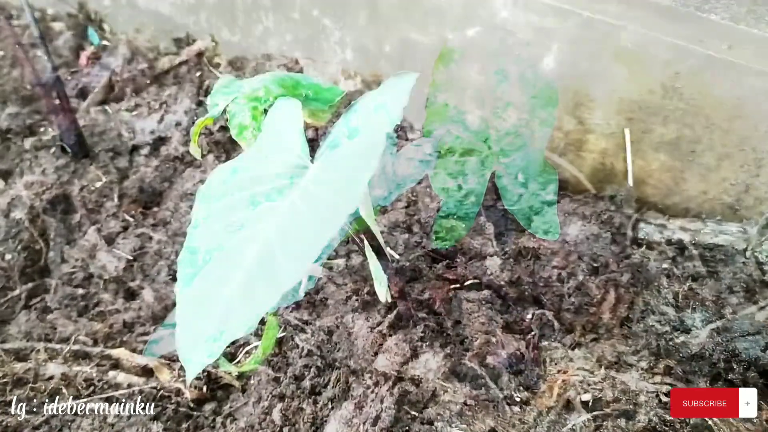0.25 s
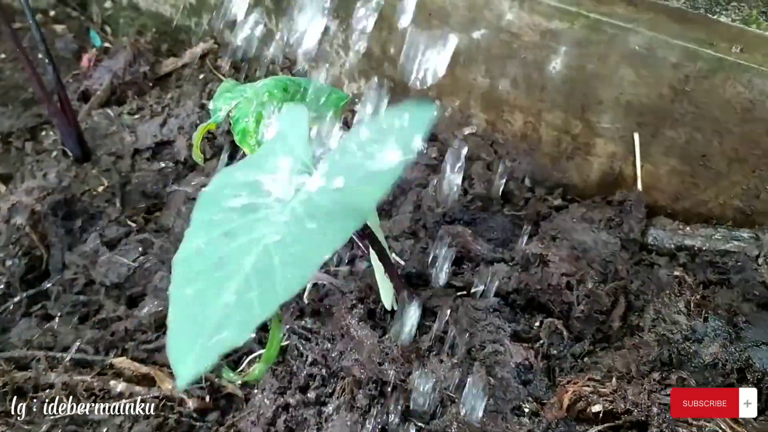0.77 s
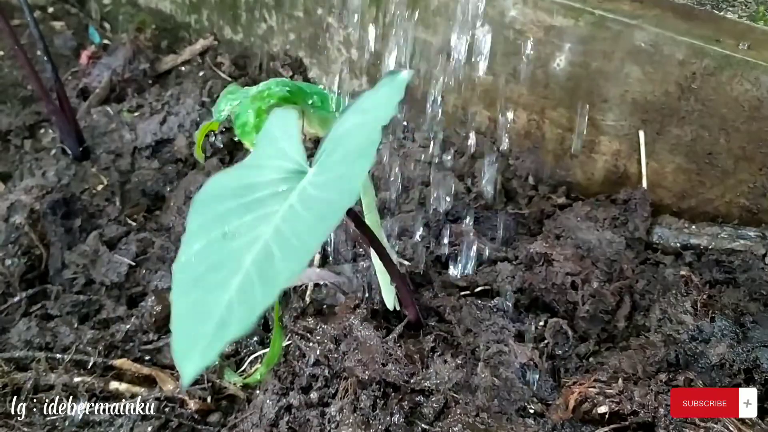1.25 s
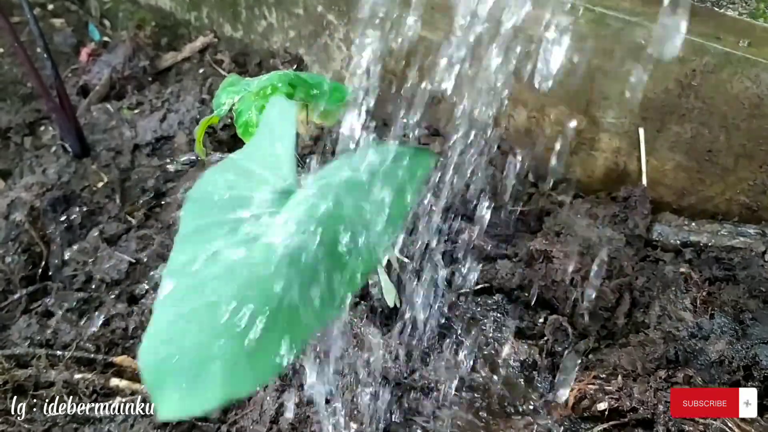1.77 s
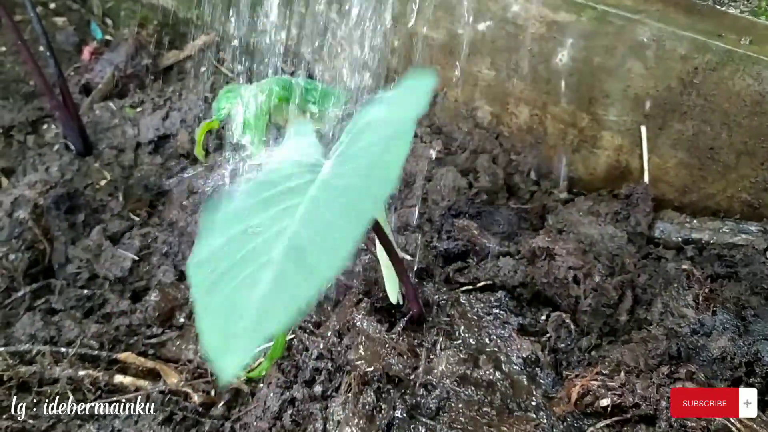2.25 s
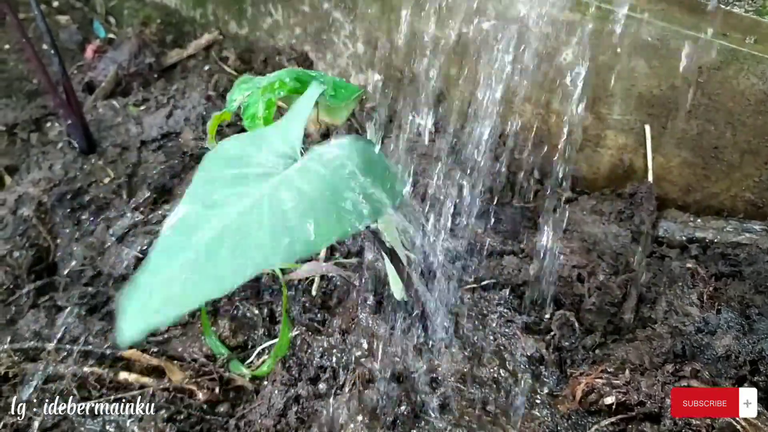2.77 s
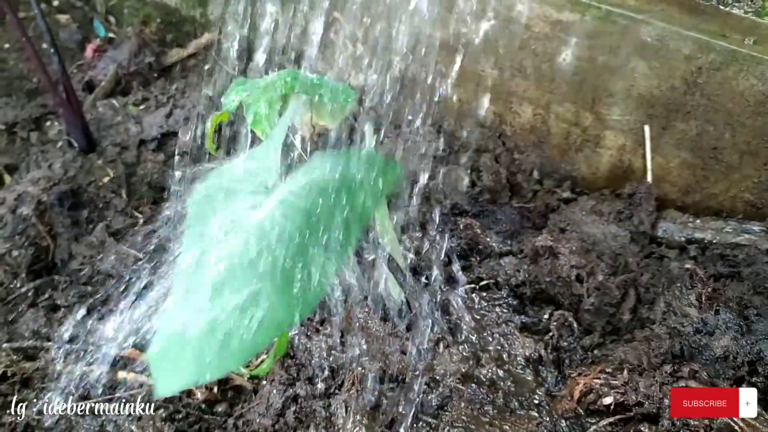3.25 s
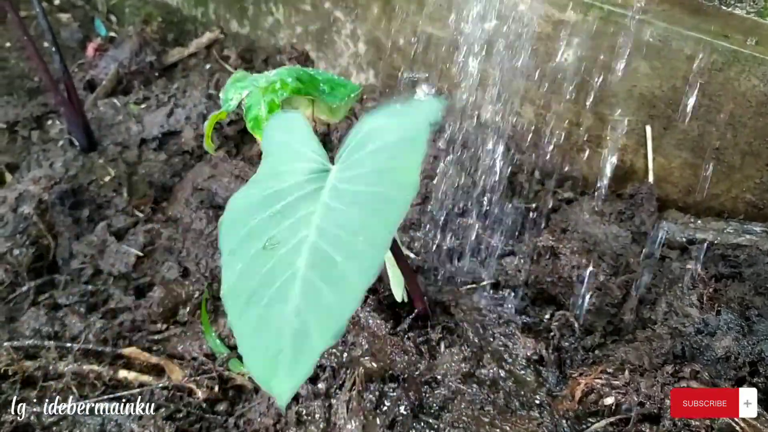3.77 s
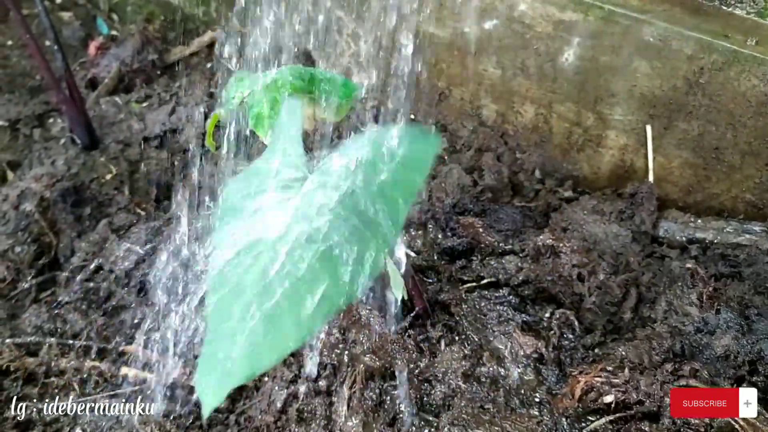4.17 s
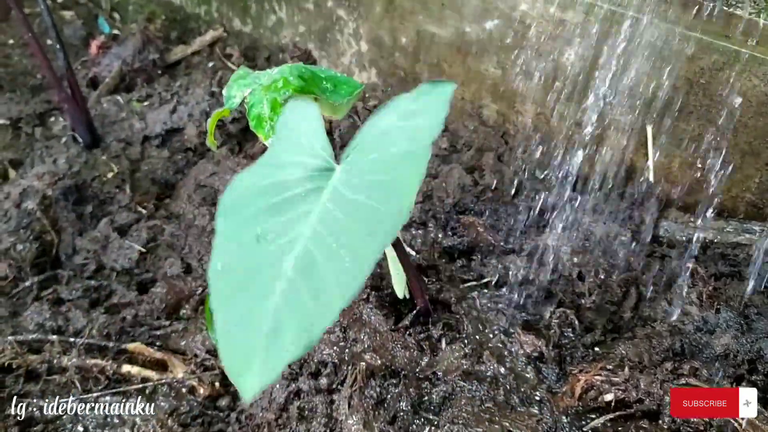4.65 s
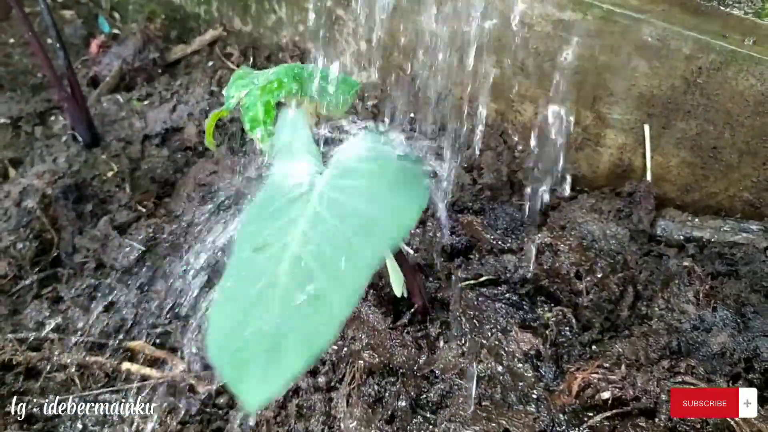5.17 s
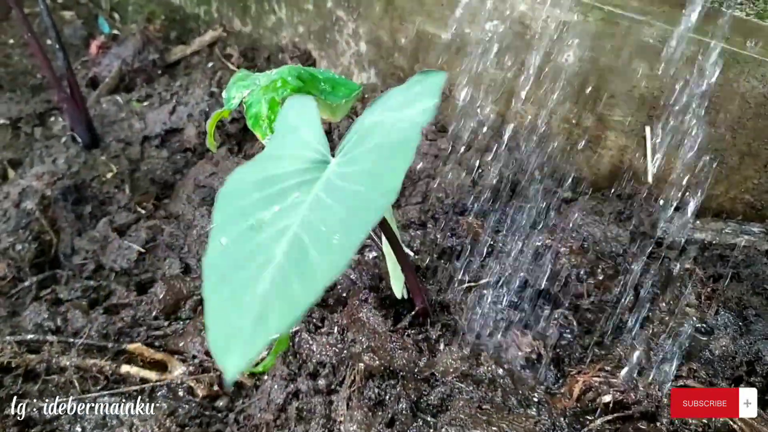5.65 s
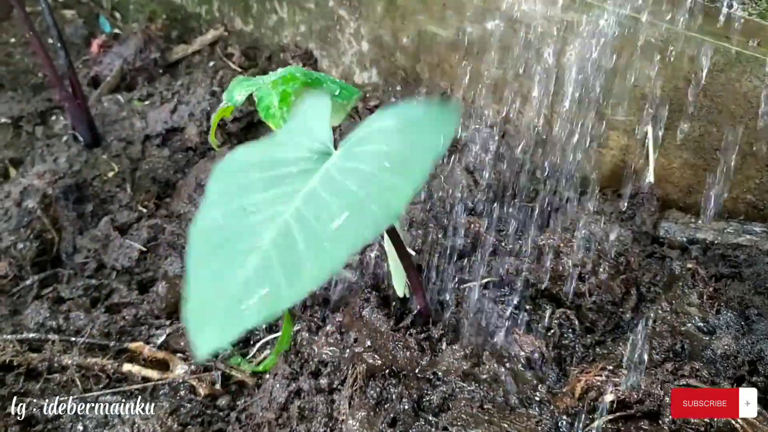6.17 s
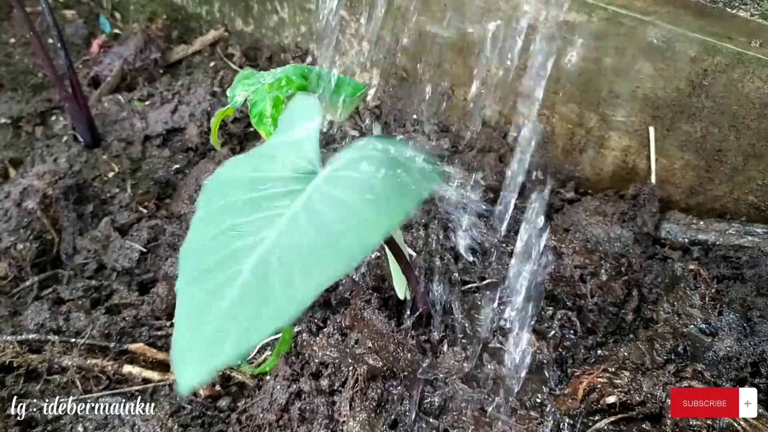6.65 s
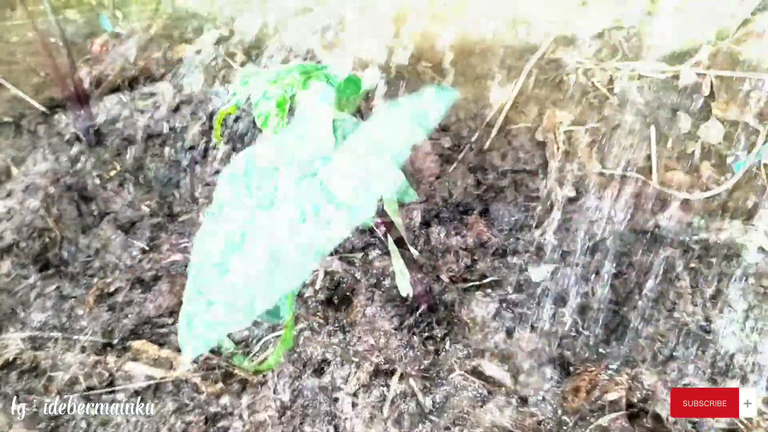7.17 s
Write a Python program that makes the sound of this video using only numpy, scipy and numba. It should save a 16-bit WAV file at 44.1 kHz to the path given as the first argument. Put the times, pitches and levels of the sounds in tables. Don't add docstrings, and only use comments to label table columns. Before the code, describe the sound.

Close, dry outdoor stereo with a bright small-microphone edge. From 0 to 1 s, quiet garden air and a low, faint traffic rumble lie under scattered sharp ticks, mostly left at first, with dull leaf taps and a few tiny rounded drips. Around 1 s the watering can's shower thickens into fizzing, irregular patter on wet soil, with bright splats and short bubble plops. Between 1.8 and 4.4 s it swings back and forth; longer soft, papery drumming comes as water crosses the broad leaf near 1.8, 2.4, 3.1 and 4 s, with a strong bubbly pop at 4.1 s. After 5 s the splats crowd closer and louder, with watery plops and another leaf crossing. A hard cluster of splats and leaf slaps hits near 6.8 s, then dense crisp showering and light drumming continue to a full, unfaded stop around 7.4 s.

```python
import sys
import numpy as np
from scipy import signal
from scipy.fft import rfft, irfft, next_fast_len
from scipy.io import wavfile
from scipy.ndimage import uniform_filter1d
from numba import njit

SR = 44100
rng = np.random.default_rng(int(sys.argv[2]) if len(sys.argv) > 2 else 0)


def generate_wav(signal):
    frames = np.transpose(np.atleast_2d(signal))
    scaled = np.clip(frames, -1, 1) * 32767
    pcm = np.round(scaled).astype(np.int16)
    wavfile.write(sys.argv[1], SR, pcm)


def invert_db(x):
    u = np.asarray(x, float) / 20
    return 10 ** u


N = 327222

# frequency in Hz, level in dB per Hz.
TRAFFIC_COLOUR = [(15, -50), (30, -29), (50, -1.5), (75, 4.5), (88, -1), (101, 5), (130, -9), (210, -20.5),
                  (350, -120)]
# frequency in Hz, level in dB per Hz.
AIR_COLOUR = [(76, -39), (130, 0.5), (263, -3.5), (1050, -12.5), (3500, -13), (6000, -14), (9000, -15),
              (15000, -24)]
# time in seconds, rumble in dB, shower left minus right in dB.
AROUND_CURVE = [(0.0, -55, 6), (0.2, -54, 16), (0.6, -50.5, 0), (0.72, -56.5, 0), (1.84, -56, 2),
                (4.36, -59.5, 1), (4.75, -57.5, 5), (5.0, -60, 0.5), (5.58, -57.5, 2.5), (5.99, -60, -0.5),
                (6.08, -52.5, 1.5), (6.38, -58, 4), (6.94, -48.5, 0.5), (7.21, -52.5, 2), (7.42, -49, 1.5)]
# time in seconds, flow in dB.
FLOW_CURVE = [(0.0, -65.5), (0.35, -61), (0.62, -60), (1.1, -49.5), (1.55, -47.5), (2.05, -50),
              (2.35, -46.5), (2.6, -52), (2.93, -48), (3.5, -50), (4.25, -47), (4.65, -49), (5.45, -47),
              (6.0, -50.5), (6.25, -45.5), (6.7, -50.5), (6.76, -42), (7.42, -41)]
# time in seconds, gain of fine spray in dB, gain of coarse patter in dB.
ROSE_GUSHES = [(0.39, -0.5, 13), (0.45, 6.5, -23), (0.57, 8, 1.5), (0.677, 11.5, 11.5), (0.85, 5, 1.5),
               (1.01, 6.5, 6), (1.2, 2, -3), (1.45, 4, -1.5), (1.682, 5, 13), (2.3, 0, 2), (2.71, 3.5, -5),
               (2.96, 4.5, 1.5), (3.201, 0.5, 3), (3.42, 4, 2.5), (4.1, -1, 6), (4.56, 1.5, -10),
               (4.99, -2, -4.5), (5.06, -2.5, 12), (5.27, -1.5, 5.5), (5.37, -4.5, -12), (5.44, 5.5, 9),
               (5.6, -0.5, 0), (5.67, 0.5, 0), (5.93, 3.5, 6), (6.57, 2, 2.5), (6.78, 0, 8), (7.03, 0.5, 5),
               (7.4, -4, 3.5)]
# start in seconds, length in seconds, drumming in dB,
# change during the crossing in dB.
LEAF_CROSSINGS = [(0.286, 0.13, -62, -3), (0.458, 0.15, -55, 2.5), (0.66, 0.052, -66, 11),
                  (0.838, 0.045, -54, 0), (1.002, 0.22, -59.5, -7.5), (1.396, 0.021, -56, 2.5),
                  (1.57, 0.1, -63, -7), (1.762, 0.29, -54, -4.5), (2.412, 0.39, -51.5, -0.5),
                  (3.096, 0.5, -52, 1), (3.99, 0.34, -52.5, 4.5), (4.877, 0.4, -56.5, -5),
                  (5.811, 0.059, -54, -1), (5.923, 0.092, -58, 5.5), (6.732, 0.11, -54.5, 0),
                  (6.89, 0.8, -56.5, 0)]
# start in seconds, peak in dB,
# droplet pitch in Hz, left minus right in dB.
TIPPING_SPLATS = [(0.1493, -64, 11600, 58), (0.166, -37.5, 7800, 16), (0.228, -54, 9900, 17),
                  (0.2446, -32.5, 9300, 15), (0.2525, -46, 9400, 8), (0.318, -34.5, 6060, 10),
                  (0.323, -37, 11100, 10), (0.3736, -33, 7600, 10), (0.377, -25, 8700, 18),
                  (0.3834, -25, 9400, 4), (0.443, -29, 9000, 7), (0.4554, -35, 10300, 7),
                  (0.471, -28.5, 10900, 5), (0.536, -33, 9500, 13), (0.5508, -34, 10700, 6),
                  (0.5952, -31, 12300, -3), (0.617, -29, 11100, 0), (0.677, -38, 10400, 2),
                  (0.7007, -32, 11400, 0), (0.73, -26, 10400, 2), (0.734, -35, 9600, 10),
                  (0.7676, -34, 10200, 7), (0.7945, -38.5, 11800, 2), (0.8253, -34.5, 9700, 2),
                  (0.8362, -35, 8600, -6), (0.8457, -25, 8400, -3), (0.8942, -34, 10000, -2),
                  (0.911, -32, 11600, 2), (0.9389, -41, 11500, -3), (0.9678, -29, 11000, 1),
                  (0.9901, -25, 7060, 4), (1.0156, -19, 11700, -4), (1.1137, -27, 10200, 1),
                  (1.179, -29, 11100, 6), (1.1951, -19.5, 9600, 4.5), (1.2097, -28, 12200, 4),
                  (1.2847, -32, 8300, 6), (1.3633, -27, 9700, -4), (1.4357, -22.5, 7100, 3),
                  (1.469, -27.5, 9100, 15), (1.5072, -28, 10800, 4), (1.5137, -23.5, 10700, 6),
                  (1.6068, -29, 8700, 11), (1.6161, -31, 12200, -5), (1.654, -25, 10000, 1),
                  (1.666, -29, 10100, 1), (1.681, -22.5, 9150, 9), (1.6966, -21, 8800, 8),
                  (1.7272, -24.5, 9500, 1), (1.8017, -33.0, 9300, 5)]
# start in seconds, peak in dB,
# droplet pitch in Hz, left minus right in dB.
SHOWER_SPLATS = [(1.8224, -21.5, 8600, 2), (1.8655, -31, 10500, 6), (2.097, -39, 8900, 5),
                 (2.1171, -40, 11000, 2), (2.1383, -40, 10500, 2), (2.2319, -31, 6300, 0),
                 (2.288, -34, 7700, -4), (2.3927, -31.0, 7300, 0), (2.6696, -28, 9400, 0),
                 (2.6775, -31, 9200, 5), (2.717, -25, 10300, 0), (2.781, -29, 9700, 0),
                 (2.8353, -35, 8200, -1), (2.8414, -37, 11500, 2), (2.8697, -29, 11100, -4),
                 (2.946, -27, 8960, 11), (3.0206, -30, 10900, 5), (3.0763, -39, 9500, 9),
                 (3.146, -28, 10000, 2), (3.2217, -29, 9900, 2), (3.2411, -44, 9900, 0),
                 (3.2999, -30, 9700, 0), (3.3085, -40, 9800, 0), (3.3611, -41, 8400, 1),
                 (3.519, -31, 12300, 5), (3.5334, -37, 9600, -5), (3.5469, -27, 9300, 11),
                 (3.7337, -21.5, 9200, 4), (3.782, -28, 8000, 6), (3.8464, -31, 7000, 4),
                 (3.8557, -37, 10300, 8), (3.869, -28.5, 8250, 4), (3.9473, -25.5, 9400, 4),
                 (3.9708, -30, 8800, 5), (3.989, -31, 8200, 10), (4.0756, -22.5, 8950, 7),
                 (4.1814, -39, 11000, -2), (4.2232, -24, 11700, -5), (4.2304, -26, 10300, 0),
                 (4.2702, -29, 9500, -4), (4.3061, -42, 10500, -5), (4.438, -22.5, 9200, 3),
                 (4.5627, -23, 7300, 6), (4.6632, -29.5, 7200, 8), (4.715, -33, 8300, 6),
                 (4.7294, -31, 11900, 5), (4.75, -33, 9500, 10), (4.8019, -31, 9000, 6),
                 (4.8278, -25, 10500, 3), (4.9077, -33, 10000, 9)]
# start in seconds, peak in dB,
# droplet pitch in Hz, left minus right in dB.
NEAR_SPLATS = [(4.9656, -22.5, 11700, -1), (4.9907, -30.5, 10100, -9), (5.0238, -43, 9400, 1),
               (5.0853, -29, 11400, -2), (5.1857, -27, 12800, -4), (5.2316, -27.5, 7700, -6),
               (5.2578, -30, 9800, -6), (5.267, -25.5, 10600, 0), (5.3102, -29.5, 9100, 9),
               (5.355, -31, 11600, 1), (5.382, -22, 10100, 7), (5.4077, -21.5, 9750, 2),
               (5.4295, -20, 10300, 4), (5.466, -22, 9900, 7), (5.4908, -20.5, 8000, 1),
               (5.5433, -26.5, 9800, 7), (5.6476, -27, 8500, 7), (5.6813, -24.5, 9200, 7),
               (5.762, -28.5, 8950, 6), (5.785, -28, 10200, 2), (5.815, -27, 8750, 4),
               (5.8203, -33, 9500, 5), (5.8697, -26, 11800, 0), (5.9359, -28, 10400, 8),
               (6.015, -30.5, 10000, -3), (6.044, -30, 9600, 3), (6.199, -23, 8650, 3),
               (6.2056, -21, 7150, 0), (6.307, -18, 8400, 1), (6.4101, -25, 9200, 6),
               (6.432, -19.5, 9700, 6), (6.477, -29, 9050, 6), (6.542, -24.5, 9400, 0),
               (6.5547, -27, 11000, -2), (6.627, -28, 6850, 6), (6.6307, -28, 9300, 4),
               (6.64, -33, 10100, 5), (6.7109, -39, 10700, 6), (6.7447, -18.5, 7900, 6),
               (6.762, -15, 9700, 2), (6.779, -22, 8160, 4), (6.8013, -24.5, 8800, 11),
               (7.0267, -21.5, 9450, 5), (7.1339, -36, 10700, 1), (7.256, -25.0, 10400, -4),
               (7.27, -18, 11000, 3), (7.2885, -34, 8100, 5), (7.346, -21, 9500, 1),
               (7.354, -19.5, 9200, 3), (7.397, -30, 11300, 10)]
# start in seconds, peak in dB, droplet pitch in
# Hz, left minus right in dB.
FURTHER_SPLATS = [(0.9884, -32, 6140, -1.5), (1.3269, -34, 11700, 1.0), (1.5863, -43, 9240, 2.5),
                  (1.906, -26.5, 6600, 1), (2.176, -27, 7000, 3), (2.3136, -42, 9290, 0.5),
                  (2.333, -28, 7550, 1), (2.6478, -41, 9150, 0.5), (2.6924, -30, 9620, -1),
                  (3.0051, -29, 10600, 9), (3.055, -33, 9700, 5), (3.179, -29, 9740, 5),
                  (3.571, -31, 9800, 2), (4.4176, -26, 11100, 2.5), (4.938, -32, 8760, -0.5),
                  (5.2116, -43, 11200, -1.5), (5.7064, -36, 11000, 1.5), (6.083, -30, 9990, -4),
                  (6.1744, -29, 8860, 2.5), (6.2465, -23, 9200, 2.0), (6.2547, -25, 7500, 2.0),
                  (6.2903, -30, 9600, 2.5), (6.2987, -26, 12000, 3.0), (6.3234, -31, 12200, 5),
                  (6.465, -30, 10300, 2.5), (6.493, -30, 10500, 2.5), (6.7295, -28, 9100, 1),
                  (6.7902, -21, 9800, 2.5), (6.8563, -34, 9600, -1), (6.9467, -21.5, 9800, 1.0),
                  (7.007, -28, 9310, 1), (7.152, -22.5, 9900, 3.0)]
# start in seconds, peak in dB, pitch in Hz, cycles of ringing.
POOL_DRIPS = [
    (0.165, -48, 1760, 7),
    (0.237, -48, 2100, 13),
    (0.371, -44, 2420, 13),
    (0.575, -46, 760, 13),
    (1.42, -41, 1520, 6.3),
    (1.655, -45, 1130, 7.3),
    (1.667, -50, 1000, 11),
    (7.023, -42, 1330, 14),
]
# start in seconds, peak in dB, pitch in Hz.
LEAF_SLAPS = [(0.276, -39.5, 1530), (0.292, -40.5, 830), (0.35, -46, 675), (0.545, -42, 690),
              (0.588, -42, 780), (0.729, -44, 805), (1.066, -39, 1360), (1.423, -39, 720),
              (1.653, -41, 1130), (1.907, -41, 770), (2.034, -51, 910), (2.667, -40, 880),
              (3.587, -40, 910), (4.154, -43, 904), (5.263, -38, 1370), (6.777, -35.5, 1740),
              (6.799, -35, 1820)]
# frequency in Hz, width in Hz, level in dB.
LEAF_MODES = [(420, 280, -4), (640, 200, -7), (870, 240, 0), (1400, 500, -9), (1960, 340, -3),
              (2500, 700, -8)]
# start in seconds, peak in dB, pitch in Hz, left minus right in dB.
BUBBLES = [(0.3186, -41, 5260, 12), (0.3726, -32, 4560, -8), (0.6316, -35, 3320, -4),
           (0.728, -41, 4470, -3), (0.8504, -19.5, 5000, 13), (1.0169, -38, 4530, 1),
           (1.408, -30.5, 4770, 15), (1.506, -30, 4960, 5), (1.657, -22.5, 4770, 3),
           (2.2337, -25, 5140, -4), (2.287, -30, 5250, -4), (2.5874, -26.5, 4740, 4),
           (2.6684, -33, 4600, -2), (2.8375, -33, 4500, 7), (2.944, -34, 5200, 3), (2.9774, -34, 3200, 2),
           (3.1354, -29, 4040, 14), (3.44, -36, 3800, -6), (3.5883, -47, 3820, 0), (3.7356, -47, 4300, 0),
           (3.7811, -30.5, 4200, -2), (3.793, -27.5, 3690, -3), (4.0762, -11.5, 4560, -1),
           (4.112, -28, 4500, -9), (4.2317, -41, 3600, 0), (4.4587, -31, 3680, 0), (4.533, -32, 5300, -7),
           (4.5757, -52, 4600, 7), (4.716, -33.5, 2800, 3), (4.751, -35.5, 2790, 8),
           (5.0277, -20, 4740, -15), (5.2666, -21, 2840, -1), (5.3817, -39, 4000, 0),
           (5.428, -24, 3700, -2), (5.465, -23.5, 3320, 2), (5.491, -25.5, 4400, 6),
           (5.5782, -30.5, 3780, 0), (5.617, -32, 2380, 11), (5.6832, -31, 5030, 5), (5.8153, -27, 4500, 1),
           (5.935, -29, 4550, 9), (6.0449, -45, 3800, 2), (6.3065, -45, 4800, 4), (6.4315, -29, 4260, 8),
           (6.496, -33, 4770, 8), (6.6275, -33, 4970, 2), (6.7774, -32, 4640, -9),
           (6.8753, -24.5, 2360, -3), (6.99, -36, 4000, -1), (7.0672, -26, 3600, 9), (7.346, -20, 5450, -2)]
# start in seconds, peak in dB, first pitch in Hz,
# last pitch in Hz, length in seconds.
CLOSING_CAVITIES = [
    (0.8483, -25, 3700, 6440, 0.0018),
    (2.2301, -23, 3880, 6800, 0.0023),
    (5.0236, -21.5, 2290, 6300, 0.0025),
]
# frequency in Hz, gain in dB.
MIC_TONE = [(20, 4.5), (3000, -3), (4000, -3), (7000, -1), (10000, 4.5), (13000, 3.5), (15500, 1.5),
            (15900, -16), (17000, -35)]

PORT_LAG = 14
FADE_DB = 18


def level(x, db):
    return x * invert_db(db) / np.sqrt(np.mean(x ** 2))


def colour(x, points):
    hz, db = np.transpose(points)
    size = next_fast_len(N)
    log_hz = np.log(np.arange(size // 2 + 1) * SR / size + 1)
    gain = invert_db(np.interp(log_hz, np.log(hz), db))
    return irfft(rfft(x, size) * gain, size)[..., :N]


def walk(rate):
    hold = int(SR / rate)
    steps = np.repeat(rng.standard_normal(N // hold + 1), hold)
    smooth = uniform_filter1d(uniform_filter1d(steps, hold), hold)
    return 2.42 * smooth[:N]


def stereo_noise(alike):
    mid, side = rng.standard_normal((2, N))
    alike = np.clip(alike, 0, 1)
    return np.sqrt(1 + alike) * mid + np.sqrt(1 - alike) * side * np.array([[1], [-1]])


def played(table):
    s, *columns = np.transpose(table)
    return (np.interp(np.arange(N) / SR, s, c) for c in columns)


@njit
def ring(start, hz, cycles, rise, size, out):
    for k in range(len(start)):
        i, f, phase, turns = int(start[k]), hz[k], 0., 0.
        while turns < 4 * cycles[k] and i < len(out) and f < .45 * SR:
            if i >= 0:
                out[i] += size[k] * min(turns, 1.) * np.exp(-turns / cycles[k]) * np.sin(phase)
            phase += 2 * np.pi * f / SR
            turns += f / SR
            f *= 1 + rise[k] * f / SR
            i += 1
    return out


def grains(s, hz, cycles, rise, db, pan_db, side):
    one = np.ones(len(s))
    ports = []
    for ear in (1, -1):
        start = s * SR + ear * side * PORT_LAG / 2
        size = invert_db(db + ear * pan_db / 2) * one
        ports.append(ring(start, hz * one, cycles * one, rise * one, size, np.zeros(N)))
    return np.array(ports)


def spatter(s, hz, db, count, lead_s, last_s, octaves, cycles, fall_db, width, pan_db=0.):
    when, tone, weak, place = rng.random((len(s), count, 4)).reshape(-1, 4).T
    s, hz, db, pan_db = (np.repeat(c, count) for c in (s, hz, db, pan_db + 0 * s))
    late = (lead_s + last_s) * when ** 2.5
    build_db = -9 * (1 - late / lead_s)
    fade_db = -fall_db * np.sqrt(late / last_s)
    shape_db = np.where(late < lead_s, build_db, fade_db)
    droplet_hz = np.minimum(hz * 2 ** (octaves * (tone - .5)), .4 * SR)
    return grains(s + late, droplet_hz, cycles, 0.016, db + shape_db - 9 * weak, pan_db,
                  width * (2 * place - 1))


def garden(rumble_db):
    rumble = level(colour(stereo_noise(.86), TRAFFIC_COLOUR), 0)
    rumble = rumble * invert_db(rumble_db - 1.0 + np.array([[.9], [-.9]]))
    air = level(colour(stereo_noise(0.71), AIR_COLOUR), -60) * invert_db(0.6 * walk(6.5))
    return rumble + air


def swing():
    gush_s, enter_s, leave_s = 0.038, 0.11, 0.14
    stray_db, coarse_db, coarse_on_leaf_db = -17.5, -10, -3.5
    t = np.arange(N) / SR
    flow_db, = played(FLOW_CURVE)

    s, fine_gain_db, coarse_gain_db = np.transpose(ROSE_GUSHES)[..., None]
    slow_t = t[::64]
    gush = np.exp(-.5 * ((slow_t - s) / gush_s) ** 2)
    fine_gain_db = np.interp(t, slow_t, np.sum(fine_gain_db * gush, axis=0))
    coarse_gain_db = np.interp(t, slow_t, np.sum(coarse_gain_db * gush, axis=0))

    drum = invert_db(flow_db + stray_db)
    for start, length, db, change_db in LEAF_CROSSINGS:
        corners = start + np.array([-enter_s, 0, length, length + leave_s])
        covered = np.interp(t, corners, [0, 1, 1, 0])
        drift_db = change_db * ((t - start) / length - .5).clip(-1, 1)
        drum = np.maximum(drum, covered * invert_db(db + drift_db))

    coarse = np.hypot(invert_db(flow_db + coarse_db), drum * invert_db(coarse_on_leaf_db)) * invert_db(coarse_gain_db)
    return invert_db(flow_db + fine_gain_db), coarse, drum


def patter(rate, hz, octaves, cycles, scatter_db, bunch_db, bunch_rate):
    when, u, v, size, place = rng.random((int(rate * N / SR), 5)).T
    spread = np.sqrt(-2 * np.log(1 - u)) * np.cos(2 * np.pi * v)
    size_db = scatter_db * np.minimum(-np.log(1 - size), 5)
    drop_hz = np.minimum(hz * 2 ** (octaves * spread), .4 * SR)
    drops = grains(when * N / SR, drop_hz, cycles, 0.026, size_db, 0., 2 * place - 1)
    return level(drops * invert_db(bunch_db * walk(bunch_rate)), 0)


def spray(rate=750):
    when, tone, size = rng.random((int(rate * N / SR), 3)).T
    bunch_db = 0.76 * walk(40)[(when * N).astype(int)]
    db = 3.4 * np.minimum(-np.log(1 - size), 3) + bunch_db
    hz = 9800 * 2 ** (1.54 * (tone - .5))
    bursts = spatter(when * N / SR, hz, db, count=15, lead_s=.002, last_s=0.013,
                     octaves=.6, cycles=3.2, fall_db=0.0, width=0.94)
    return level(bursts, 0)


def splats():
    drops = TIPPING_SPLATS + SHOWER_SPLATS + NEAR_SPLATS + FURTHER_SPLATS
    s, db, hz, pan_db = np.transpose(drops)
    side = (rng.random(len(s)) - .5) / 5
    tick = grains(s, hz, 1.67, 0., db + 2.5, pan_db, side)
    thud = grains(s, 0.57 * hz, 2.2, 0., db - 11, pan_db, side)
    burst = spatter(s + 0.00034, hz, db + 3.0, count=18, lead_s=0.000078, last_s=.008,
                    octaves=0.93, cycles=2.54, fall_db=FADE_DB, width=.7, pan_db=pan_db)
    return tick + thud + burst


def drips():
    s, db, hz, cycles = np.transpose(POOL_DRIPS)
    return grains(s, hz, cycles, 0.0034, db, 0., 0.14)


def slaps():
    s, db, hz = np.transpose(LEAF_SLAPS)
    return spatter(s, hz, db - 0.5, count=24, lead_s=0.002, last_s=0.018,
                   octaves=1.98, cycles=2.6, fall_db=13.5, width=0.34)


def leaf():
    chance, size = rng.random((N, 2)).T
    blows = (chance < 3000 / SR) * invert_db(4.7 * np.minimum(-np.log(1 - size), 4))
    blows = blows + 0.44 * np.std(blows) * stereo_noise(0.)
    drum = 0
    for hz, width, db in LEAF_MODES:
        b, a = signal.iirpeak(hz, hz / width, SR)
        drum = drum + invert_db(db) * signal.lfilter(b, a, blows)
    drum = drum * invert_db(1.26 * walk(45) + np.array([[-.6], [.6]]))
    return level(np.array([np.roll(drum[0], 4), drum[1]]), 0)


def plops():
    s, db, hz, pan_db = np.transpose(BUBBLES)
    side, rise = rng.random((len(s), 2)).T
    side = (side - .5) / 4
    bubble = grains(s - .0002, 0.963 * hz, 3.54, 0.047 * rise, db - 2.0, pan_db, side)
    tick = grains(s - .0002, hz * 1.82, 1.3, 0., db + 0.5, pan_db, side)
    crown = spatter(s + 0.00097, hz, db - 10, count=24, lead_s=.0005, last_s=0.014,
                    octaves=0.9, cycles=4.5, fall_db=FADE_DB, width=0.7, pan_db=pan_db)
    return bubble + tick + crown


def cavities():
    open_s, close_s = 0.00034, 0.00032
    out = np.zeros(N)
    t = np.arange(400) / SR
    for s, db, first_hz, last_hz, length in CLOSING_CAVITIES:
        hz = first_hz * (last_hz / first_hz) ** np.minimum(t / length, 1.2)
        swell = 0.67 + 0.51 * t / length
        shape = np.minimum(t / open_s, 1) * np.where(t < length, swell, np.exp((length - t) / close_s))
        note = invert_db(db) * shape * np.sin(2 * np.pi * np.cumsum(hz) / SR)
        out[int(s * SR):][:len(t)] += note
    return out


def scene():
    fine, heavy, drum = swing()
    rumble_db, pan_db = played(AROUND_CURVE)
    coarse = patter(2600, hz=4010, octaves=0.513, cycles=3.8, scatter_db=3.0, bunch_db=3.0, bunch_rate=50)
    shower = spray() * fine + coarse * heavy
    shower = shower * invert_db(np.array([pan_db, -pan_db]) / 2)
    water = shower + splats() + plops() + cavities()
    return water + slaps() + drips() + leaf() * drum + garden(rumble_db)


def low_pass(x):
    return signal.sosfilt(signal.butter(12, 16810, fs=SR, output="sos"), x)


def record(dry):
    heard = colour(dry, MIC_TONE)
    mix = np.tanh(3 * heard) / 3
    return low_pass(mix)


dry = scene()
out = record(dry)
generate_wav(out)
```